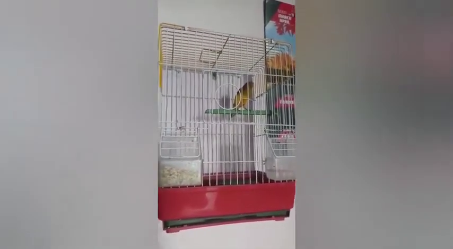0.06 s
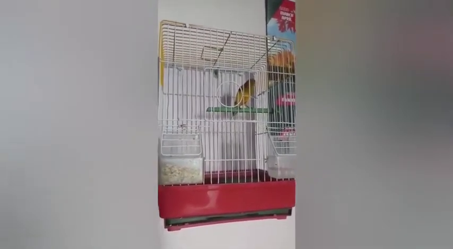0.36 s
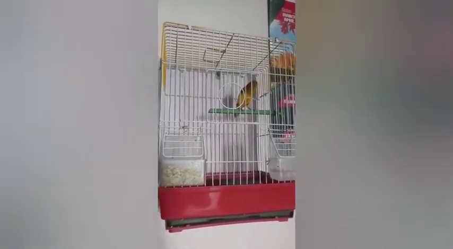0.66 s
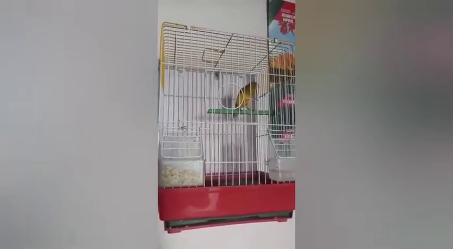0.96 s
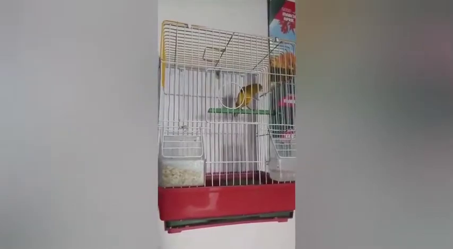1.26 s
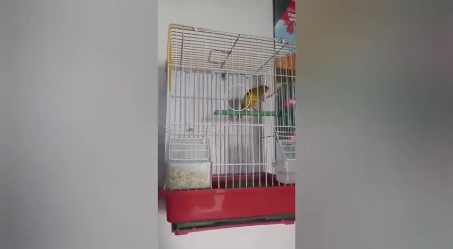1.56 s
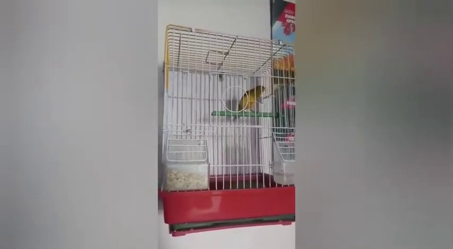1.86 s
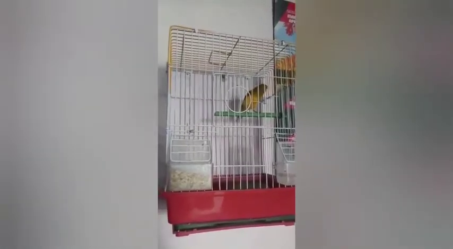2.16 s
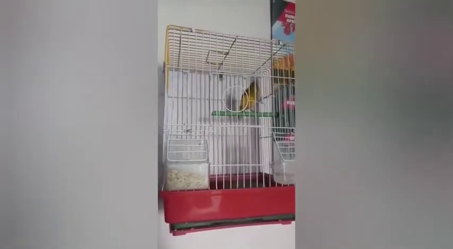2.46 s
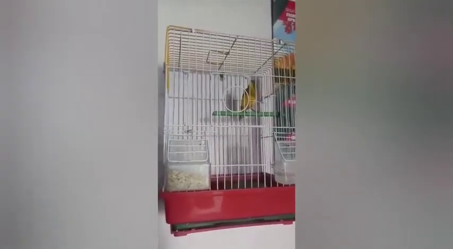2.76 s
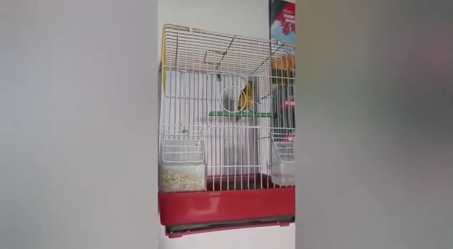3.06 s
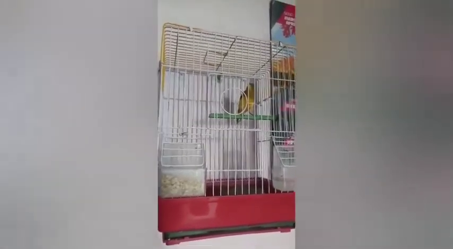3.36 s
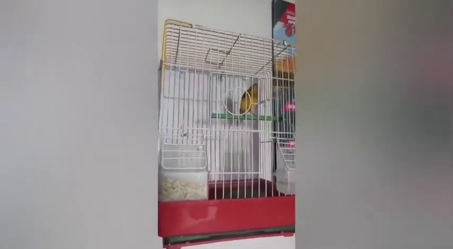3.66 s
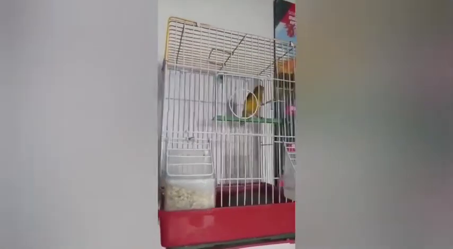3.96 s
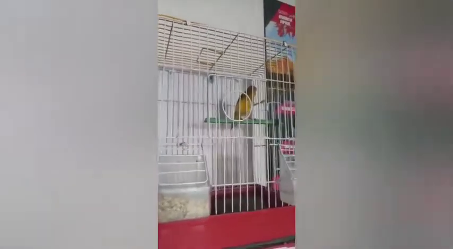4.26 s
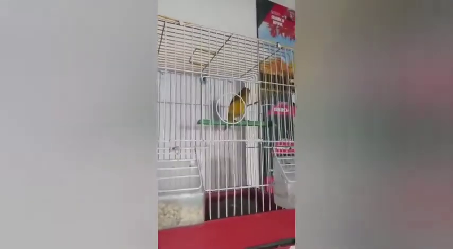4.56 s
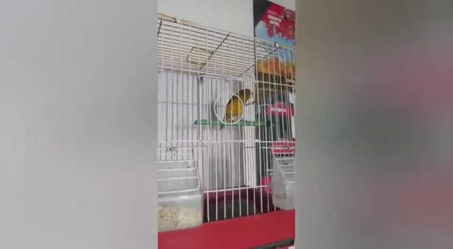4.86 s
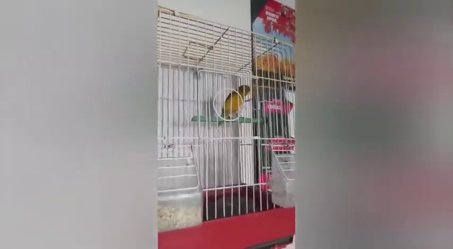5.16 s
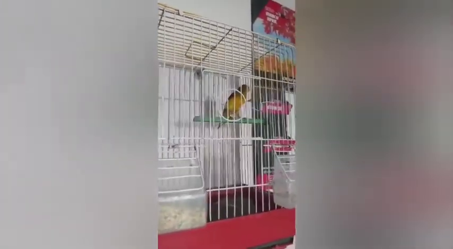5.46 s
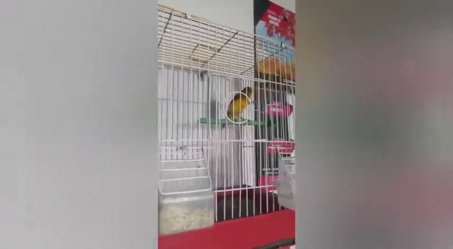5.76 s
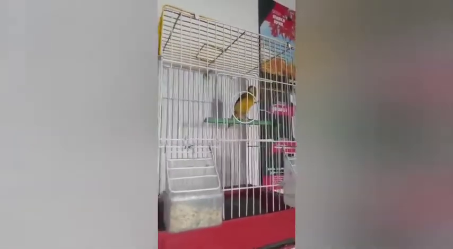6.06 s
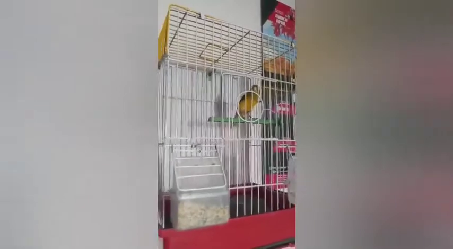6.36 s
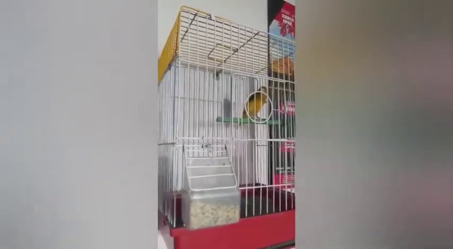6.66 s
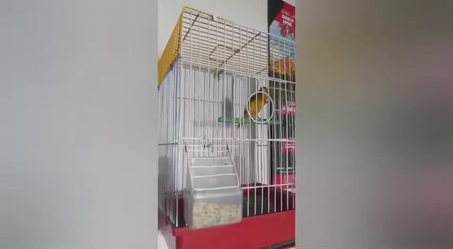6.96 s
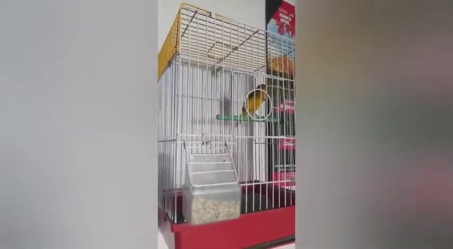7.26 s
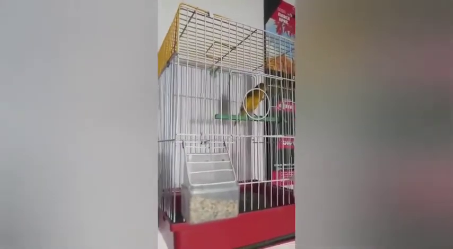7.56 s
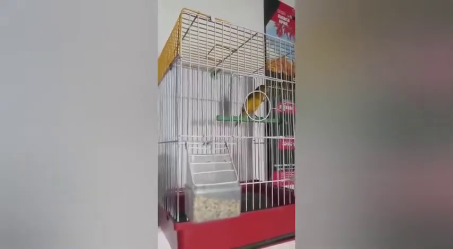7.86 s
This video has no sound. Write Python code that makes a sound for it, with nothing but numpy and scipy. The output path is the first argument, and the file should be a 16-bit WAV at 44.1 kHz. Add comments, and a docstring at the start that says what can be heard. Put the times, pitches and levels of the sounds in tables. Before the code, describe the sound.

A canary in a cage sings close to the microphone in a hard-walled room. It gives four quick runs of five or six high, clear chirps, with pauses of about two seconds between them. Further off, other small birds answer with faint warbled whistles and buzzy rasps, softened by the room's echo. A low hum and a soft rush of air continue underneath.

```python
"""A caged canary, close by in a hard-walled room, sings four quick runs of arched chirps.
Each chirp is a near-pure tone shaped by throat and beak, with slaps off the cage tray and wall behind it.
Other small birds further off answer with warbled whistles and buzzy rasps, mostly through the room's echo.
Underneath, a low hum sits in the room's modes and a soft rush of air goes on."""
import sys
import numpy as np
from scipy import signal
from scipy.fft import rfft, irfft, next_fast_len
from scipy.io import wavfile
from scipy.ndimage import uniform_filter1d, minimum_filter1d

SR = 44100
rng = np.random.default_rng(int(sys.argv[2]) if len(sys.argv) > 2 else 0)


def generate_wav(sig):
    """Save sig (samples, or channels by samples) to the path in sys.argv[1] as 16-bit PCM at SR."""
    pcm = np.round(np.clip(np.atleast_2d(sig).T, -1, 1) * 32767).astype(np.int16)
    wavfile.write(sys.argv[1], SR, pcm)


N = 349272

# fader rides of the background, before its trims: time_s, hum_db, air_db
BED_RIDES = [(0.0, -39.5, -40), (2.25, -39.5, -39), (3.29, -42.5, -41.5), (4.41, -35, -37.5),
             (5.78, -37.5, -39), (6.88, -31.5, -37), (7.92, -36, -39.5)]
# room modes that carry the hum: pitch_hz, base_width_hz, relative_db
ROOM_MODES = [(47, 23, -19), (64.5, 5.9, -13.5), (88.6, 6, -12.5), (97.2, 10.7, -3), (134.4, 10.8, -2),
              (148.3, 5.7, -1.5), (167.5, 5.6, -2.5), (187.5, 14.4, -9)]
# tone of the rush of air: frequency_hz, gain_db
AIR_EQ = [(30, -12.5), (120, -14.5), (260, 5.5), (315, 3), (350, 8), (405, 8.5), (500, 2), (750, 2),
          (1300, 0.5), (1800, -2), (2900, -4), (4200, -9), (6000, -17.5), (8000, -18), (15000, -47.5)]
# the clearer far whistles: start_s, length_s, middle_hz, glide_octaves, relative_db
WHISTLE_CUES = [(.79, 0.041, 3620, 0.33, -35.5), (.825, .11, 2450, 0.3, -43),
                (.855, .11, 3016, 0.13, -35.5), (.995, 0.071, 2040, -0.2, -43.5),
                (1.105, 0.19, 3017, 0.23, -36.5), (1.375, 0.066, 4680, 0.19, -29),
                (1.886, 0.041, 2644, .05, -41.5), (1.94, .05, 2120, .15, -39),
                (2.016, 0.025, 2732, 0, -36.5), (2.17, .16, 2077, .2, -38), (2.397, 0.067, 3310, -0.1, -35),
                (3.413, 0.041, 3490, 0.45, -34.5), (3.435, 0.069, 2330, 0.72, -37),
                (3.515, .04, 3230, 0.2, -28.5), (3.583, 0.084, 3260, -0.14, -35),
                (4.912, .2, 2172, 0.24, -40.5), (5.24, 0.061, 3476, 0.27, -34.5),
                (5.324, 0.05, 3772, .015, -32), (5.52, 0.052, 4200, 0.34, -37.5),
                (5.635, 0.018, 5230, -0.16, -31), (5.85, 0.2, 4620, -.1, -42.5),
                (6.003, 0.13, 3290, -.23, -35), (6.125, .1, 4850, 0.09, -35),
                (6.2, 0.064, 5085, -0.19, -27.5), (6.266, 0.029, 5820, 0.12, -35),
                (6.311, 0.15, 2120, -.2, -38), (6.442, 0.17, 2303, -0.14, -34.5),
                (6.558, 0.091, 4270, 0.71, -26.5), (6.67, 0.064, 4750, -0.37, -30),
                (7.141, 0.072, 3950, -0.3, -39), (7.665, 0.071, 2080, 0.33, -42)]
# far rasps: start_s, length_s, centre_hz, relative_db
RASP_CUES = [(0.534, 0.093, 6380, -29), (1.026, 0.15, 6770, -28), (1.123, 0.2, 5670, -27.5),
             (1.314, 0.13, 7700, -36.5), (1.566, .067, 6210, -27.5), (2.147, 0.1, 6680, -26.5),
             (3.331, 0.17, 4790, -38.5), (3.57, .075, 4860, -26.5), (3.645, 0.049, 6320, -29.5),
             (4.397, 0.043, 4720, -25.5), (5.019, 0.18, 6130, -29), (5.694, 0.068, 5110, -31),
             (5.804, 0.097, 6820, -26), (6.214, 0.17, 7830, -33), (6.338, 0.12, 7000, -29),
             (6.38, 0.23, 4280, -36), (6.481, 0.19, 7550, -42.5), (6.898, 0.027, 5520, -33),
             (7.03, 0.012, 5870, -22), (7.193, 0.035, 5060, -34), (7.85, 0.022, 6720, -29)]
# tone shared by all rasps: frequency_hz, gain_db
RASP_EQ = [(1500, -53), (2800, 6), (4000, 3.5), (5500, -1.5), (7500, -9.5), (9000, -5.5), (12000, -14.5),
           (15500, -15)]
# canary chirps, in four runs: start_s, length_s, start_hz, top_hz, relative_db
CHIRP_CUES = [(.372, .083, 2480, 6000, -10.5), (0.494, 0.033, 2520, 3860, -9.5),
              (0.535, .032, 2414, 4225, -6), (0.581, .027, 3700, 4460, -6.5),
              (0.637, 0.018, 4274, 4570, -5.5), (.678, 0.023, 4426, 4570, -9.5),
              (2.437, 0.078, 2450, 6120, -8.5), (2.556, 0.031, 2540, 3990, -5),
              (2.595, 0.033, 2640, 4220, -5), (2.653, 0.026, 4404, 4620, -6),
              (2.709, 0.016, 4450, 4460, -8), (2.753, 0.021, 4370, 4727, -9),
              (4.764, 0.033, 2140, 3736, -2), (4.819, 0.027, 3816, 4820, -8.5),
              (4.876, .030, 4110, 5030, -12.5), (4.935, 0.024, 4470, 4780, -9),
              (4.994, 0.035, 4010, 4580, -9.5), (7.305, .028, 2255, 3900, -3.5),
              (7.359, 0.035, 2680, 4386, -6.5), (7.422, 0.023, 4410, 4530, -7),
              (7.474, 0.025, 3900, 4870, -12), (7.527, 0.023, 4436, 4670, -10),
              (7.578, 0.032, 4310, 4580, -14)]
# partials of a chirp before the throat: multiple, level_db
CHIRP_PARTIALS = [(1, -1), (2, -23), (3, -33), (4, -38)]
# what the canary's throat and beak let through: frequency_hz, gain_db
THROAT_EQ = [(2300, -20), (3000, -13), (3500, -5), (3850, 0), (5400, 0), (6300, 0), (7500, -14),
             (9000, -19), (13000, -9)]
# tone of the direct path from beak to microphone: frequency_hz, gain_db
DIRECT_EQ = [(2500, -4.5), (4200, -2), (5300, 7), (5700, 0.5), (6100, -15), (7500, 1), (13000, -4.5)]
# pitch at which the direct chirp dips, shifting from run to run as the microphone moves: time_s, pitch_hz
DIRECT_NOTCH = [(.6, 4670), (2.7, 4600), (4.9, 4990), (7.4, 5120)]
# tone of the song as it spreads out to the walls: frequency_hz, gain_db
SPREAD_EQ = [(2500, 4.5), (3400, -3), (4100, -7), (4700, 3), (5300, 9.5), (6100, -4)]
# slaps off the cage tray and the wall behind it: delay_s, gain_db
SLAPS = [(.0021, -20.5), (.0047, -17.5), (.0093, -22.5)]
# a dip in the treble around 9-11 kHz over the whole mix: frequency_hz, gain_db
TREBLE_DIP_EQ = [(7500, 0.5), (8700, -3), (9400, -21.5), (10200, -13.5), (12000, -2), (15500, -3)]


def from_db(db):
    """Decibels to gain."""
    return 10 ** (np.asarray(db) / 20)


def unit_rms(x):
    """Scale to an rms of one."""
    return x / np.sqrt(np.mean(x ** 2) + 1e-20)


def gain_at(curve, hz):
    """Read an EQ curve as gain, on a log-frequency axis."""
    curve_hz, curve_db = np.transpose(curve)
    return from_db(np.interp(np.log(np.maximum(hz, 1)), np.log(curve_hz), curve_db))


def equalise(x, curve):
    """Run a sound through an EQ curve."""
    size = next_fast_len(len(x) + 2048)
    return irfft(rfft(x, size) * gain_at(curve, np.fft.rfftfreq(size, 1 / SR)), size)[:len(x)]


def resonate(x, hz, width_hz):
    """One resonance with unity gain at its peak."""
    r = np.exp(-np.pi * width_hz / SR)
    feedback = [1, -2 * r * np.cos(2 * np.pi * hz / SR), r * r]
    return signal.lfilter(np.array([1, 0, -1]) * (1 - r * r) / 2, feedback, x)


def wander(t, per_s):
    """Random wavering around zero within one call, with a spread of about one."""
    knots = rng.standard_normal(512)
    return np.interp(t * per_s, np.arange(len(knots)), knots)


def swell(t, length_s, attack_s, release_s):
    """Smooth fade in and out of a call."""
    fade_in = np.sin(np.pi / 2 * np.clip(t / attack_s, 0, 1))
    fade_out = np.sin(np.pi / 2 * np.clip((length_s - t) / release_s, 0, 1))
    return fade_in * fade_out


def add(track, start_s, sound):
    """Mix a sound into a track."""
    at = max(round(start_s * SR), 0)
    track[at:at + len(sound)] += sound[:max(N - at, 0)]


def room_hum(widen=1.37):
    """A noise rumble held in the room's low modes."""
    rumble = rng.standard_normal((2, N + SR))
    hum = np.zeros(N + SR)
    for k, (hz, base_width_hz, db) in enumerate(ROOM_MODES):
        width_hz = widen * base_width_hz
        hum += from_db(db) * resonate(resonate(rumble[k % 2], hz, width_hz), hz, width_hz)
    return unit_rms(hum[SR:])  # a second of pre-roll lets the modes build


def background(hum_trim_db=-0.5, air_trim_db=2.0):
    """The bed: the hum under a soft rush of air, each slowly rising and falling."""
    t = np.arange(N) / SR
    time_s, hum_db, air_db = np.transpose(BED_RIDES)
    hum = from_db(np.interp(t, time_s, hum_db) + hum_trim_db) * room_hum()
    air = unit_rms(equalise(rng.standard_normal(N), AIR_EQ))
    return hum + from_db(np.interp(t, time_s, air_db) + air_trim_db) * air


def room_echo(x, build_s, early_db, early_s, t60_s=0.48, crossover_hz=7000):
    """Dense wall reflections: strong early ones, then a tail whose treble dies sooner."""
    t = np.arange(SR) / SR
    white = rng.standard_normal(SR)
    low = signal.sosfilt(signal.butter(2, crossover_hz, fs=SR, output="sos"), white)
    high = signal.sosfilt(signal.butter(2, crossover_hz, "high", fs=SR, output="sos"), white[::-1])
    tail = low * from_db(-60 * t / t60_s) + high * from_db(-60 * t / (.7 * t60_s))
    tail *= (1 - np.exp(-t / build_s)) * (1 + from_db(early_db) * np.exp(-t / early_s))
    return signal.fftconvolve(x, tail / np.sqrt(np.sum(tail ** 2)))[:N]


def twitter_cues(count=64, per_s=7, usual_s=.06, usual_hz=3186, glide_octaves=.9, relative_db=-47.5):
    """Faint filler whistles at loosely even times, each with its own length, pitch and glide."""
    nudge, stretch, detune, glide = rng.uniform(-1, 1, (count, 4)).T
    start_s = (np.arange(count) + 1 + nudge / 2) / per_s
    length_s = usual_s * (1 + stretch / 2)
    middle_hz = usual_hz * 2 ** (detune / 2)
    return np.transpose([start_s, length_s, middle_hz, glide_octaves * glide, np.full(count, relative_db)])


def far_whistles(arch_octaves=0.0315, wide_glide_octaves=.2, octave_db=-15):
    """Warbled tones that glide up or down along a shallow arch."""
    out = np.zeros(N)
    for start_s, length_s, middle_hz, octaves, level_db in [*WHISTLE_CUES, *twitter_cues()]:
        t = np.arange(int(length_s * SR)) / SR
        along = t / length_s - .5
        glide_hz = middle_hz * 2 ** (octaves * along - arch_octaves * (2 * along) ** 2)
        # wide glides warble most, held notes are nearly pure
        warble = 0.0046 + 0.0486 * min(abs(octaves) / wide_glide_octaves, 1)
        hz = glide_hz * (1 + warble * wander(t, per_s=421))
        phase = 2 * np.pi * np.cumsum(hz) / SR
        # high notes are forced and carry a stronger octave
        strain = min(middle_hz / 5000, 1) ** 2
        tone = np.sin(phase) + strain * from_db(octave_db) * np.sin(2 * phase)
        envelope = swell(t, length_s, attack_s=.01, release_s=.008)
        add(out, start_s, from_db(level_db) * envelope * unit_rms(tone))
    return out


def far_rasps(buzz_hz=260, jitter=0.24, throat_width_hz=3200, octave_db=-8):
    """Harsh calls: a fast buzz throws the pitch about and chops a hiss in the throat's resonance."""
    out, breath = np.zeros(N), rng.standard_normal(N)
    for start_s, length_s, centre_hz, level_db in RASP_CUES:
        puff = breath[int(start_s * SR):][:int(length_s * SR)]
        t = np.arange(len(puff)) / SR
        rate_hz = buzz_hz * (1 + jitter * wander(t, per_s=150))
        buzz = np.sin(2 * np.pi * np.cumsum(rate_hz) / SR)
        hz = centre_hz * (1 + .04 * buzz + .08 * wander(t, per_s=45) + .03 * wander(t, per_s=900))
        phase = 2 * np.pi * np.cumsum(hz) / SR
        # the voice breaks into thirds of its pitch, which adds a partial on either side
        squeal = np.sin(phase) + .35 * np.sin(phase * 2 / 3) + .6 * np.sin(phase * 4 / 3)
        squeal += from_db(octave_db) * np.sin(2 * phase)
        chopped = puff * (1 + .8 * buzz) ** 2
        hiss = .8 * unit_rms(resonate(chopped, centre_hz, throat_width_hz))
        rasp = unit_rms(equalise(squeal + hiss, RASP_EQ))
        envelope = swell(t, length_s, attack_s=.014, release_s=.014)
        add(out, start_s, from_db(level_db) * envelope * rasp)
    return out


def chirp_arch(t, length_s, start_hz, top_hz, end_hz, bow_hz_per_s2=2.5e5):
    """Pitch of one chirp: a quick climb, a gently bowed top, a steep dive."""
    climb_s = .0053 * (top_hz / 4400) ** 2.4  # higher notes climb longer
    dive_s = .0115 * (length_s / .03) ** .5  # longer notes dive longer
    held_hz = top_hz - bow_hz_per_s2 * (t - length_s / 2) ** 2
    climb = np.exp(-(t / climb_s) ** 1.35)
    dive = np.clip(1 - (length_s - t) / dive_s, 0, 1) ** 2.1
    return held_hz - (held_hz - start_hz) * climb - (held_hz - end_hz) * dive


def chirp_voice(t, hz, top_hz, flank_db_per_octave=3, hiss_db=-41):
    """A near-pure tone through throat and beak, with a trace of hiss; weaker below its top pitch."""
    phase = 2 * np.pi * np.cumsum(hz) / SR
    flank_db = flank_db_per_octave * np.log2(hz / top_hz)
    tone = from_db(hiss_db) * rng.standard_normal(SR)[:len(t)]
    for multiple, db in CHIRP_PARTIALS:
        # higher partials flicker more and fade more on the flanks of the arch
        shift_db = (multiple - 1) * (2 * wander(t, per_s=130) + flank_db / 2)
        tone += from_db(db + shift_db) * gain_at(THROAT_EQ, multiple * hz) * np.sin(multiple * phase)
    return from_db(flank_db) * np.sqrt(2) * tone


def canary(notch_db=-8, notch_width_hz=220, reverb_db=-7.0):
    """The close song: direct sound notched by a reflection, short slaps, then the room's echo."""
    direct, radiated, slaps = np.zeros((3, N))
    for start_s, length_s, start_hz, top_hz, level_db in CHIRP_CUES:
        t = np.arange(int(length_s * SR)) / SR
        end_hz = 2176 + 80 * start_s  # the dives get shallower from run to run
        hz = chirp_arch(t, length_s, start_hz, top_hz, end_hz) * (1 + .004 * wander(t, per_s=400))
        # notes that start high fade in; the others enter through the throat's weak low range
        envelope = swell(t, length_s, attack_s=0.0057 * (start_hz / top_hz) ** 2, release_s=0.0018)
        chirp = from_db(level_db) * envelope * chirp_voice(t, hz, top_hz)
        notch_hz = np.interp(start_s, *np.transpose(DIRECT_NOTCH))
        in_notch = np.exp(-((hz - notch_hz) / notch_width_hz) ** 2)
        add(direct, start_s, chirp * from_db(notch_db * in_notch))
        add(radiated, start_s, chirp)
    radiated = equalise(radiated, SPREAD_EQ)
    for delay_s, db in SLAPS:
        add(slaps, delay_s, from_db(db) * radiated)
    reverb = room_echo(radiated, build_s=0.0021, early_db=8.5, early_s=0.13)
    return equalise(direct, DIRECT_EQ) + slaps + from_db(reverb_db) * reverb


def scene(whistle_db=5.0, rasp_db=-3.0, far_direct_db=-11):
    """The mono mix: canary up front, far birds mostly in reverb, the bed underneath."""
    calls = from_db(whistle_db) * far_whistles() + from_db(rasp_db) * far_rasps()
    far_birds = from_db(far_direct_db) * calls + room_echo(calls, build_s=.004, early_db=0, early_s=.038)
    return (canary() + far_birds + background())[None]


def record(dry, ceiling=.92, limiter_samples=45, cutoff_hz=15800):
    """The master chain: a treble dip around 9-11 kHz, a fast limiter on the peaks, a steep high cut."""
    heard = equalise(dry[0], TREBLE_DIP_EQ)
    gain = np.minimum(1, ceiling / (np.abs(heard) + 1e-9))
    gain = uniform_filter1d(minimum_filter1d(gain, size=limiter_samples), size=limiter_samples)
    high_cut = signal.ellip(12, .1, 90, cutoff_hz, fs=SR, output="sos")
    return signal.sosfilt(high_cut, heard * gain)[None]


dry = scene()
out = record(dry)
generate_wav(out)
```